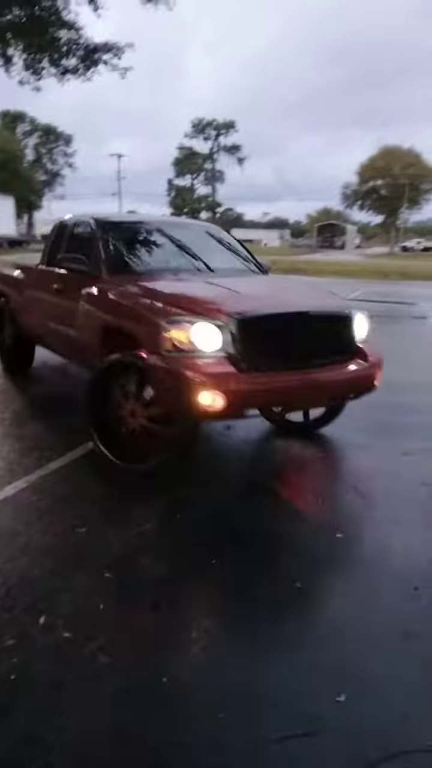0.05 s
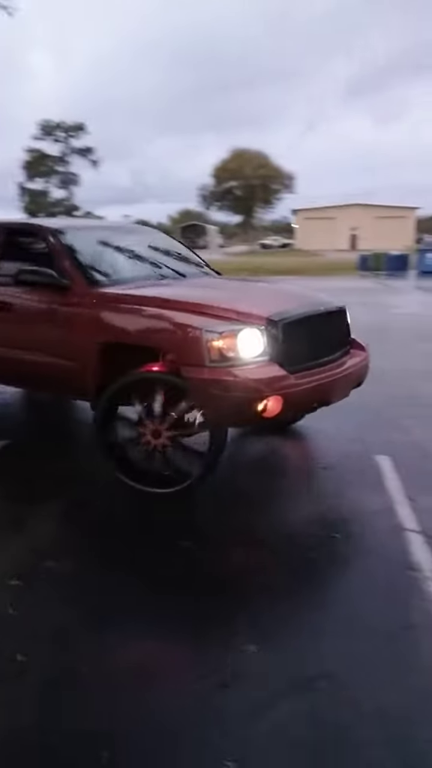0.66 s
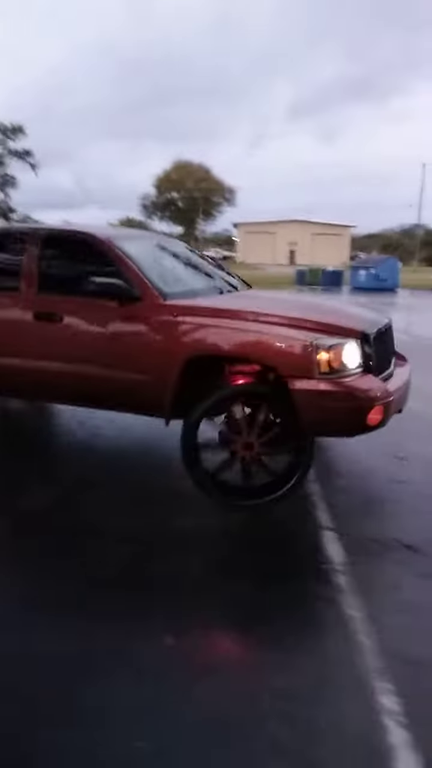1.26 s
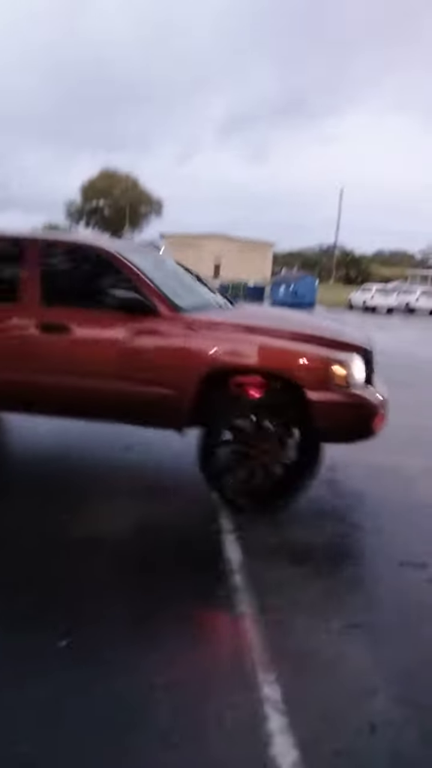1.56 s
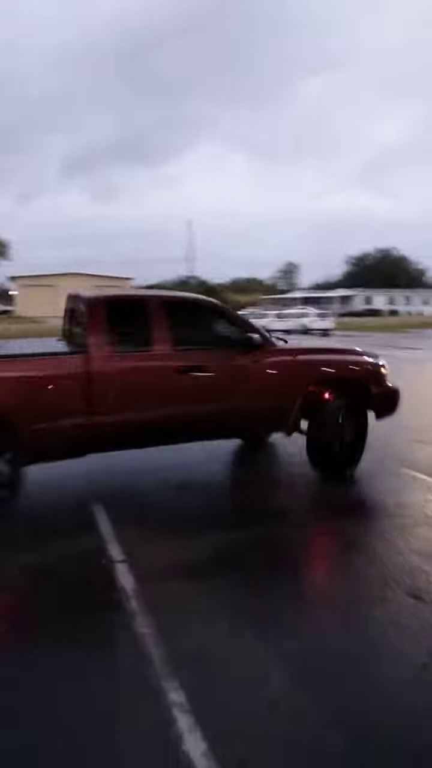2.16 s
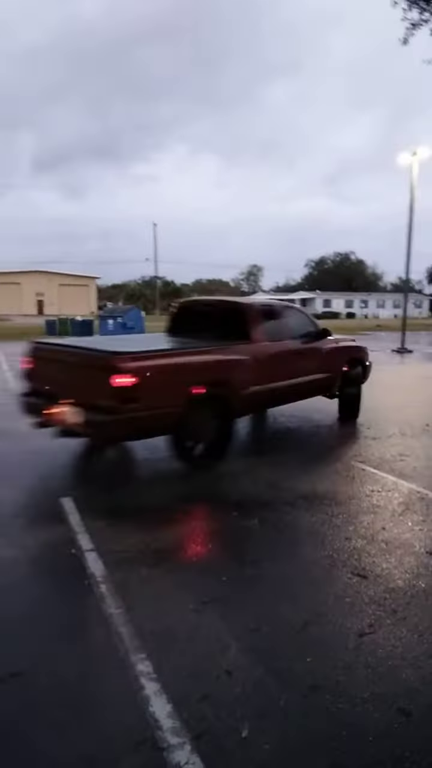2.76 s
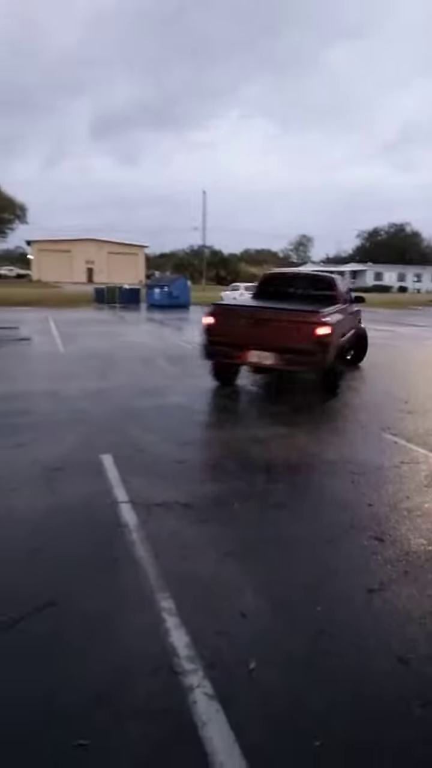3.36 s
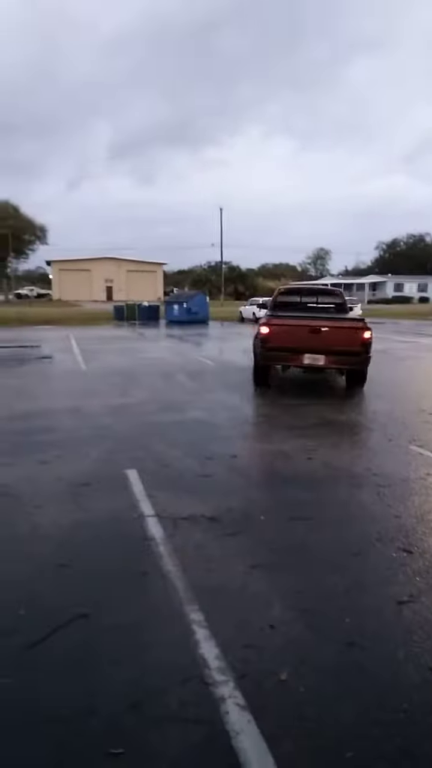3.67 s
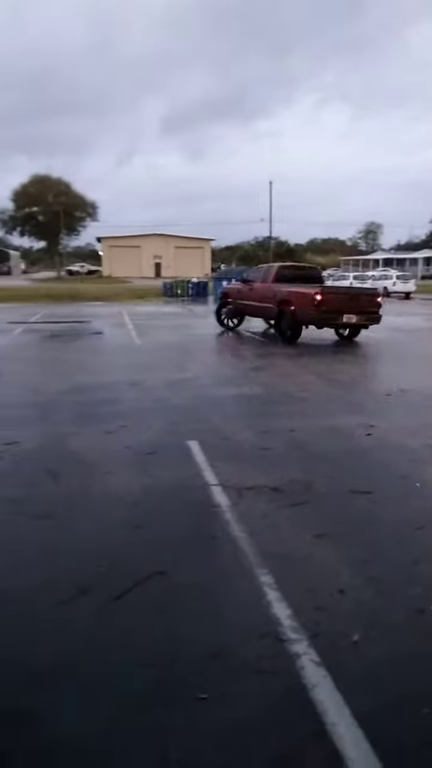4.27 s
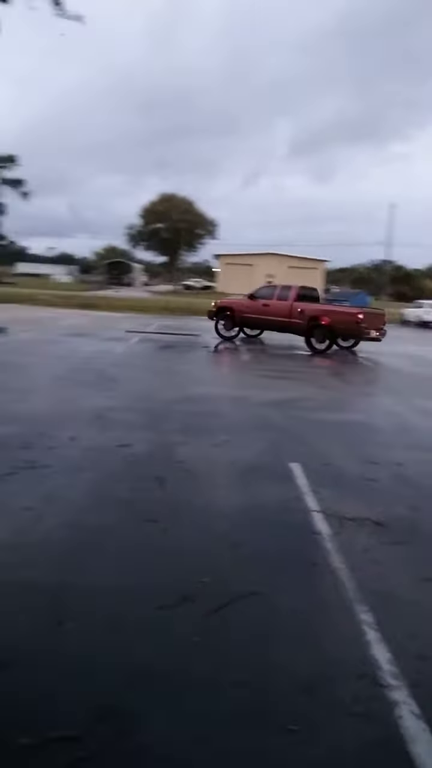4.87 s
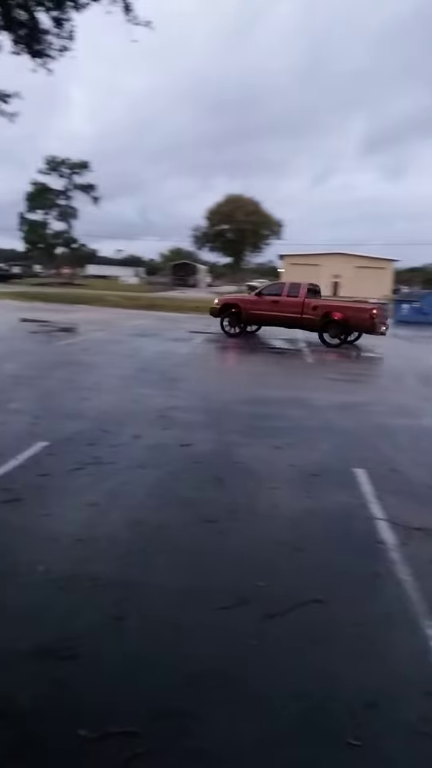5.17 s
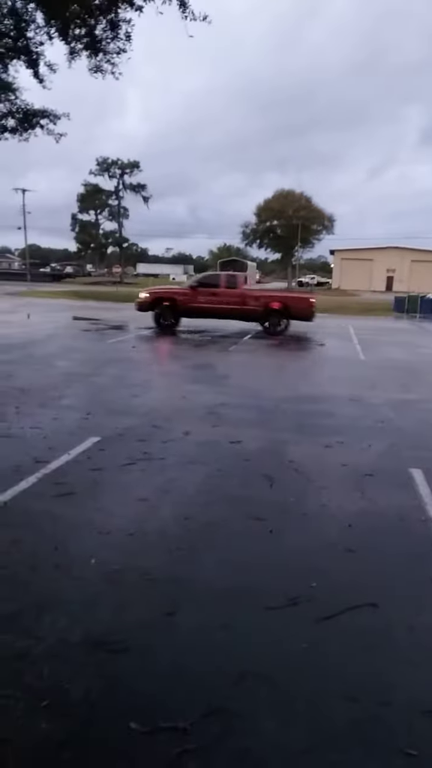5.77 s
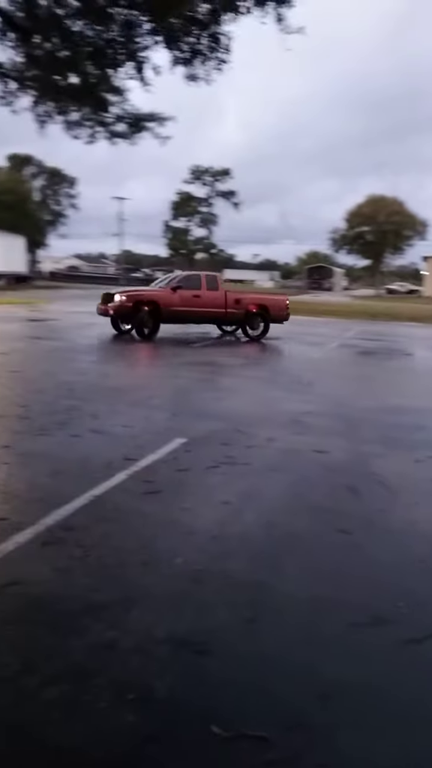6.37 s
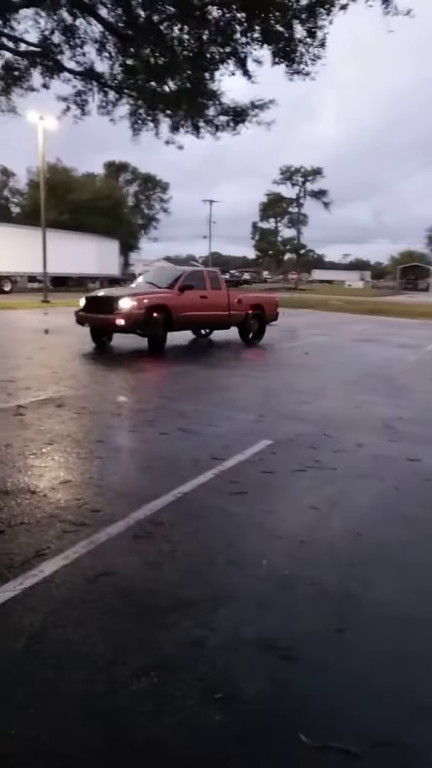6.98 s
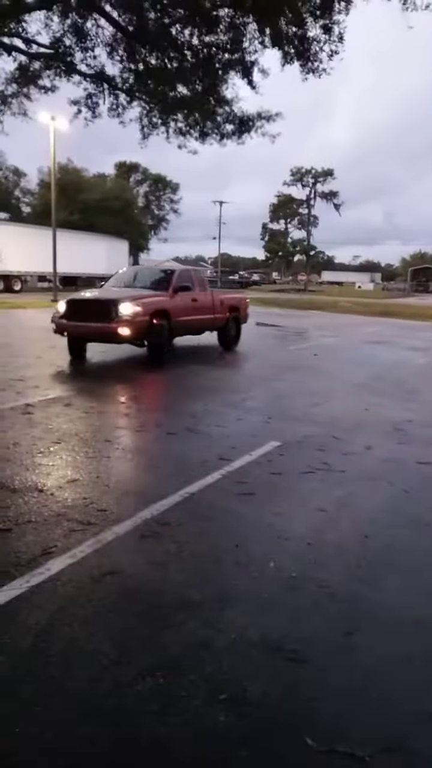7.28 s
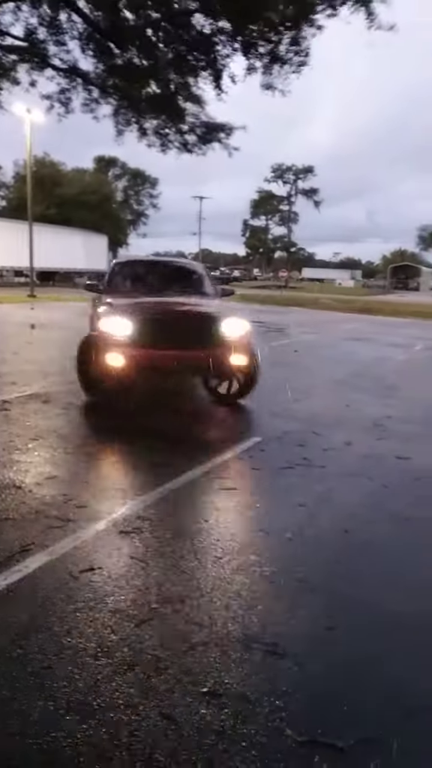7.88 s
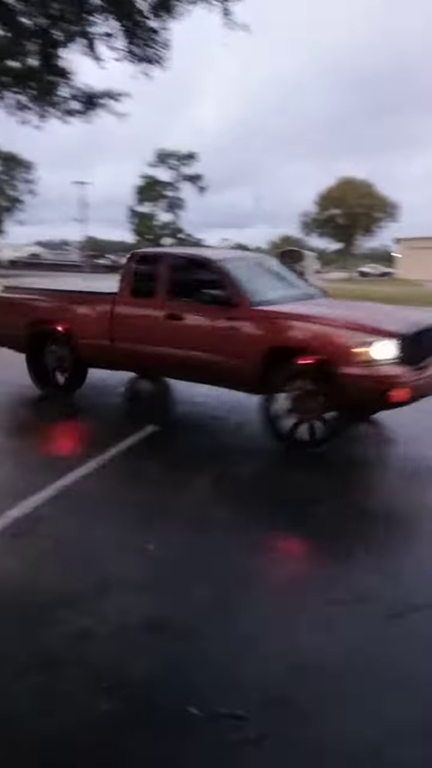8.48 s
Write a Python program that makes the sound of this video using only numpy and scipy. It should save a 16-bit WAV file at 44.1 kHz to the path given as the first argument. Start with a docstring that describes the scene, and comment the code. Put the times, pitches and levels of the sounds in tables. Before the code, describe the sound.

A pickup truck's exhaust throbs low on a wet, open car park while wind bumps the hand-held microphone. At about 1 second the engine revs hard, rising in pitch until just after 2 seconds, as the truck passes close with a swish and hiss of spray. The revs drop briefly. From about 3 seconds a second, longer run climbs, loudest near 4 seconds, where it slightly overloads the microphone. The rear tyres break loose and scrub with a rough, watery roar from roughly 4 to 6 seconds, with one short tick near 5 seconds. The pitch peaks at around 5.4 seconds, then falls as the throttle closes. By 7 seconds the truck is coasting with a quiet, uneven burble and light tyre hiss. Gusts thump on the microphone from about 6 seconds until the end at around 8.5 seconds.

```python
"""Wind thumps on a hand-held stereo microphone over the low throb of a pickup truck's loud exhaust.
The truck circles a wet, empty car park, revving hard twice, its notes sweeping the pipe's resonances.
It passes close in a hiss of spray, swings away with its rear tyres scrubbing, then coasts back.
The microphone's left port is shaded from the truck, and the loudest notes overload it."""
import sys
import numpy as np
from scipy import signal
from scipy.fft import rfft, irfft, next_fast_len
from scipy.io import wavfile
from scipy.ndimage import uniform_filter1d, map_coordinates

SR = 44100
rng = np.random.default_rng(int(sys.argv[2]) if len(sys.argv) > 2 else 0)


def to_wav(s):
    """Save 16-bit WAV."""
    ch = np.atleast_2d(s).T  # columns
    pcm = np.round(np.clip(ch, -1, 1) * 32767)  # PCM
    wavfile.write(sys.argv[1], SR, pcm.astype(np.int16))


N = 375732

# what the exhaust pipe passes, with three resonances: (frequency [Hz], gain [dB])
PIPE_RESPONSE = [(25, -42), (42, -24), (60, -21), (85, -11), (108, -6), (130, 1), (143, -10), (176, -13.5),
                 (203, -4.5), (220, -8), (250, -9), (272, -3.5), (305, -15), (385, -18), (450, -19),
                 (570, -21), (740, -13), (900, -14), (1200, -24)]


def exhaust(speed, angle, flutter=.081, rough=.47, smear=.092, half_order_db=-20):
    """Crank orders sweep through the pipe's resonances; unequal cylinders add half orders."""
    # exhaust loudness at the microphone, swelling and dipping as the truck revs and circles:
    # (time [s], relative level [dB])
    drive = [(0, -32.5), (.85, -27.5), (1.18, -12), (1.48, -15.5), (1.84, -9), (2.11, -6.5), (2.19, -16.5),
             (2.34, -10), (2.42, -18.5), (2.62, -26), (2.95, -9.5), (3.15, -12), (3.85, -5), (4.7, -13.5),
             (4.95, -9.5), (5.3, -21), (5.55, -28), (5.72, -17.5), (6.1, -16.5), (6.52, -22), (6.8, -38),
             (7.5, -30)]
    # when nose, near side, tail, far corner and far side face the microphone: (time [s])
    facings = [1.3, 2, 3.6, 4.7, 6]
    # the strong notes, a row for each of crank orders 1 to 5: (gain at each facing [dB])
    strong_orders = [(9, 5, 8, 2, 9), (3.5, 3, 3, 0.5, 6.5), (0.5, -9, 2, 9.5, 1.5),
                     (0.5, 2.5, 1.5, -8.5, -2.5), (-6.5, 0, -1.5, 7.5, -3.5)]
    drive_db = curves(drive)[0]
    ragged = amp(4 * np.log2(speed.mean() / speed) + 3 * overrun(speed))  # at low revs and off throttle
    notes = np.zeros(N)
    for order in np.arange(2, 33) / 2:
        strong = order % 1 == 0 and order <= len(strong_orders)
        if strong:
            order_db = curves(list(zip(facings, strong_orders[int(order) - 1])))[0]
            order_db += .6 * (order - 1) * wander(5.5)  # the higher notes swell and fade by chance
        else:
            order_db = -5 - 1.63 * max(order - len(strong_orders), 0)
            order_db += half_order_db if order % 1 else 0
        level = amp(drive_db + order_db + read(PIPE_RESPONSE, order * speed))
        level *= 1 + ragged * (flutter * wander(21) if strong else rough * wander(8.4))
        phase = order * angle + pipe_phase(order)
        phase += smear * ragged * order / 10 * wander(8.4)  # timing jitter blurs the high orders
        notes += np.sqrt(2) * level * np.cos(phase)
    return notes + amp(drive_db - 20) * ragged * burble(angle)


def burble(angle, top_hz=440):
    """Uneven firing sends noisy puffs down the pipe, two to a turn of the crank."""
    puffs = rng.standard_normal(N) * (1 + np.cos(2 * angle))
    puffs = filtered(puffs, lambda hz: 1 / (1 + (hz / top_hz) ** 4))
    return coloured(puffs, PIPE_RESPONSE)


def pipe_phase(order):
    """The pipe spreads each puff in time; its echoes scatter the phases of the high orders."""
    return -.7 * order ** 2 if order <= 5 else 2 * np.pi * rng.random()


def overrun(speed, shut_turns_per_s2=10):
    """0 on the throttle, toward 1 as the revs fall with the throttle shut."""
    falling = -SR * np.gradient(uniform_filter1d(speed, size=6000))
    return np.tanh(np.maximum(falling, 0) / shut_turns_per_s2)


def scrub(level_db, angle, gain_db=4.5, drift_db=.1, throb=.17):
    """Rear tyres slip on wet asphalt: a rough roar with brief flares, throbbing with the engine."""
    # slipping rubber: (frequency [Hz], relative level [dB])
    spectrum = [(250, 4), (500, -6.5), (700, 4.5), (950, -0.5), (1300, -2), (1700, -4.5), (2100, -6.5),
                (2600, -11), (3100, -12.5), (3600, -12), (6000, -25.5), (12000, -77.5)]
    grip = amp(drift_db * wander(28)) * (1 + throb * (np.cos(angle) + np.cos(2 * angle)))
    roar = patchy(coloured(port_noise(), spectrum), depth_db=2.5, span_hz=88.5, span_s=.03)
    return amp(level_db + gain_db) * unit(roar * grip)


def spray(level_db, gain_db=7, drops_db=-9, drops_per_s=500, spread_db=6):
    """Water thrown off the treads: a fine hiss with separate drops in it."""
    # flying water: (frequency [Hz], relative level [dB])
    spectrum = [(400, 4.5), (1500, 4), (2800, 4), (4500, 0.5), (7500, -5), (9500, -0.5), (10600, -8.5),
                (12000, -18.5), (16000, -29)]
    sizes = amp(spread_db * np.minimum(rng.exponential(1, N), 4.5)) * rng.choice([-1, 1], N)
    drops = unit(sizes * (rng.random(N) < drops_per_s / SR))
    hiss = coloured(port_noise() + amp(drops_db) * drops, spectrum) * amp(1.1 * wander(20))
    return amp(level_db + gain_db) * unit(hiss)


def swish(s, half_length_s, peak_db, hz, octaves):
    """A tyre squeezes out water as it passes closest to the microphone."""
    water = filtered(rng.standard_normal(N), lambda f: np.exp(-(np.log2((f + 1) / hz) / octaves) ** 2))
    swell = np.exp(-((np.arange(N) / SR - s) / half_length_s) ** 2)
    return amp(peak_db) * swell * unit(water)


def ticks(decay_s=.001):
    """Short dry ticks, each a burst of noise that dies at once."""
    # (time [s], level before the tone shaping [dB])
    bursts = [(.802, -32), (.876, -31), (2.203, -29), (2.596, -31), (2.82, -32), (4.939, -11), (6.467, -23),
              (7.404, -30), (8.316, -25)]
    out, t = np.zeros(N), np.arange(600) / SR
    for s, db in bursts:
        out[round(s * SR):][:len(t)] += amp(db) * np.exp(-t / decay_s) * rng.standard_normal(len(t))
    return filtered(out, lambda hz: amp(read([(2000, 14.5), (9500, -4), (14000, -12)], hz)))


def wind(shared=.26, thump_db=-3, slap_db=14, strong_wind_db=-15.5, bright_gust_db=-11):
    """Lumpy turbulence, mostly on the right port; stronger wind and gusts reach higher in pitch."""
    # wind at the microphone: (time [s], level [dB])
    strength = [(0, -35.5), (.2, -23), (.5, -26), (.75, -28.5), (1.35, -24), (1.9, -18), (2.6, -35.5),
                (3.1, -40), (4, -20), (4.3, -47), (5.3, -38), (5.85, -17.5), (6.25, -24.5), (6.72, -16.5),
                (6.9, -18), (7.25, -20), (7.29, -26), (7.95, -22.5), (8.35, -15.5)]
    # sudden gusts: (time [s], relative level [dB], rise [s])
    gust_events = [(.191, -20, .006), (.222, -14, .004), (.243, -19, .004), (.452, -21, .014),
                   (1.485, -19, .008), (5.786, -16, .005), (5.813, -14, .005), (5.868, -17, .014),
                   (5.983, -14, .006), (6.082, -15, .008), (6.55, -19, .016), (6.603, -16, .01),
                   (6.71, -16, .028), (6.807, -13, .006), (6.823, -12.5, .005), (7.01, -19, .025),
                   (7.175, -18, .012), (7.23, -20, .012), (8.19, -16, .012), (8.31, -18, .008),
                   (8.405, -10, .008), (8.489, -4, .007)]
    # slow buffeting and fast eddies, each (frequency [Hz], relative level [dB])
    buffet_spectrum = [(10, -20), (30, 4), (110, -2), (200, -3), (300, -13), (500, -30), (2000, -69)]
    eddy_spectrum = [(30, -8), (150, -1), (420, -3), (650, -12), (1100, -31), (4000, -54), (12000, -80)]
    wind_db = curves(strength)[0]
    eddy_db = -17 + 2.5 * (wind_db - strong_wind_db)  # eddies grow more steeply than the wind itself
    gusts = sum(amp(db) * gust(s, rise) for s, db, rise in gust_events)
    slaps = amp(slap_db) * sum(amp(db) * slap(s, rise) for s, db, rise in gust_events)
    air = rng.standard_normal((2, N)) + shared * rng.standard_normal(N)
    rumble = unit(coloured(air, buffet_spectrum) * amp(wander(25)))
    rumble *= amp(wind_db) + amp(thump_db) * gusts
    eddies = coloured(rng.standard_normal((2, N)) * amp(3.2 * wander(40)), eddy_spectrum)
    eddies *= amp(eddy_db) + gusts * (gusts / amp(bright_gust_db)) ** .4
    return rumble * amp([[-6], [0]]) + (eddies + slaps) * amp([[-13], [0]])


def gust(s, rise):
    """The air speeds up quickly at time s and slackens more slowly."""
    u = np.maximum(np.arange(N) / SR - s, 0) / rise
    return u * np.exp(np.maximum(1 - u, -50))


def slap(s, rise, width_s=.0018):
    """The single push and pull of pressure as a gust peaks; harder the faster it rose."""
    u = (np.arange(N) / SR - s - rise) / width_s
    return width_s / rise * (1 - 2 * u ** 2) * np.exp(-np.minimum(u ** 2, 50))


def port_noise():
    """White noise at the microphone's two ports, least alike in the high treble."""
    # likeness of the tyre noise at the ports: (frequency [Hz], coherence [0 to 1])
    likeness = [(500, 0.58), (3000, 0.79), (7000, 0.33)]
    common, own = rng.standard_normal((2, N))
    same = lambda hz: np.clip(read(likeness, hz), 0, 1)
    left = filtered(common, same) + filtered(own, lambda hz: np.sqrt(1 - same(hz) ** 2))
    return np.array([left, common])


def shaded_port(x):
    """The left port hears the truck dulled and, after the close pass, slightly late."""
    # lag behind the right port as the truck's bearing changes: (time [s], delay [samples])
    lag = [(2.2, -1.3), (3, 2.5), (4.1, 6), (7.1, 5.7), (8.5, 2)]
    # shading of the port: (frequency [Hz], gain [dB])
    shade = [(400, 0), (1000, -3.5), (1450, -4.5), (2200, 0.5), (3400, -11.5), (4300, -6.5), (5800, -16.5),
             (9000, -20.5), (15000, -15)]
    delayed = map_coordinates(x, [np.arange(N) - curves(lag)[0]], order=3, mode="nearest")
    return filtered(delayed, lambda hz: amp(read(shade, hz)))


def amp(db):
    """Decibels to gain."""
    return 10 ** (np.asarray(db) / 20)


def unit(x):
    """Scales to rms 1."""
    return x / np.sqrt(np.mean(x ** 2) + 1e-20)


def curves(rows):
    """Each column of a timed table, sample by sample."""
    s, *columns = np.transpose(rows)
    return [np.interp(np.arange(N) / SR, s, c) for c in columns]


def read(points, hz):
    """Interpolates a spectrum on a log-frequency axis."""
    f, value = np.transpose(points)
    return np.interp(np.log(hz + 1), np.log(f), value)


def filtered(x, gain):
    """Applies a gain that is a function of frequency."""
    size = next_fast_len(N + 4096)
    return irfft(rfft(x, size) * gain(np.fft.rfftfreq(size, 1 / SR)), size)[..., :N]


def coloured(x, spectrum):
    """Gives x a spectrum, at rms 1."""
    return unit(filtered(x, lambda hz: amp(read(spectrum, hz))))


def wander(hz):
    """A smooth random drift of rms about 1, mostly slower than hz."""
    f = np.fft.rfftfreq(8192, 1 / 800)
    slow = irfft(rfft(rng.standard_normal(8192)) / (1 + (f / hz) ** 4))
    return np.interp(np.arange(N) / SR, np.arange(8192) / 800, unit(slow))


def patchy(x, depth_db, span_hz, span_s):
    """Lets patches of the spectrum flare and fade at random."""
    hz, s, bins = signal.stft(x, SR, nperseg=512, noverlap=384)
    field = rng.standard_normal(bins.shape[-2:])
    for axis, steps in enumerate([span_hz / hz[1], span_s / s[1]]):
        field = signal.lfilter([1], [1, -np.exp(-1 / steps)], field, axis=axis)
    return signal.istft(bins * amp(depth_db * unit(field)), SR, nperseg=512, noverlap=384)[1][..., :N]


def scene():
    """The truck circles on the open asphalt; the wind acts on the microphone ports themselves."""
    # engine revs: (time [s], crankshaft speed [turns/s])
    revs = [(.85, 25.5), (1.1, 29.8), (1.22, 33.5), (1.35, 38.5), (1.6, 48.3), (1.78, 53.4), (1.97, 56),
            (2.12, 56.2), (2.35, 41.1), (2.5, 30.5), (2.65, 26.7), (2.84, 27.8), (2.97, 33), (3.08, 41.5),
            (3.19, 47), (3.47, 55.3), (4.09, 61.2), (4.72, 68.4), (4.95, 75.2), (5.37, 84.5), (5.67, 70),
            (5.95, 59.2), (6.33, 55.9), (6.51, 50.2), (6.8, 45), (7.5, 26)]
    # a close pass, then the rear tyres break loose and grip again:
    # (time [s], relative scrub level [dB], relative spray level [dB])
    tyres = [(0, -58, -67), (.15, -51, -56), (.8, -49, -56.5), (1.4, -41, -44.5), (2.05, -37.5, -38.5),
             (2.45, -40.5, -53), (3.7, -37, -47), (3.82, -27.5, -47.5), (4.25, -20.5, -38),
             (4.8, -23, -38.5), (5.1, -21.5, -38), (5.72, -27, -40.5), (6.1, -37, -43.5),
             (6.65, -30, -42.5), (7, -35, -48.5), (8.2, -40, -45.5)]
    # each passing tyre: (time [s], half length [s], top level [dB], centre [Hz], width [octaves])
    front_tyre = (1.48, .07, -39, 4900, .4)
    rear_tyre = (2.25, .4, -40, 2500, .28)
    speed = curves(revs)[0] * (1 + .0016 * wander(7.15))
    angle = 2 * np.pi * np.cumsum(speed) / SR
    scrub_db, spray_db = curves(tyres)
    left, right = exhaust(speed, angle) + scrub(scrub_db, angle) + spray(spray_db) + ticks()
    return np.array([shaded_port(left) + swish(*front_tyre), right + swish(*rear_tyre)]) + wind()


def record(dry, edge_hz=16000):
    """The overloaded microphone rounds off peaks near full scale; the highest treble is cut."""
    rounded = dry / (1 + dry ** 8) ** (1 / 8)
    lowpass = signal.firwin(511, edge_hz, window=("kaiser", 9), fs=SR)
    return signal.oaconvolve(rounded, lowpass[None], "same")


dry = scene()
out = record(dry)
to_wav(out)
```